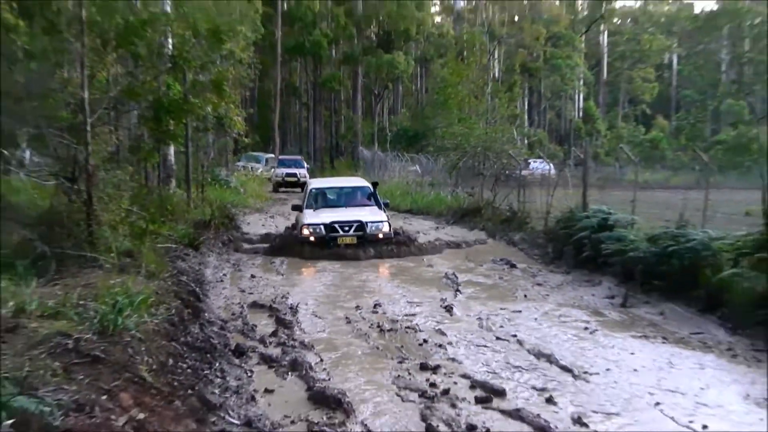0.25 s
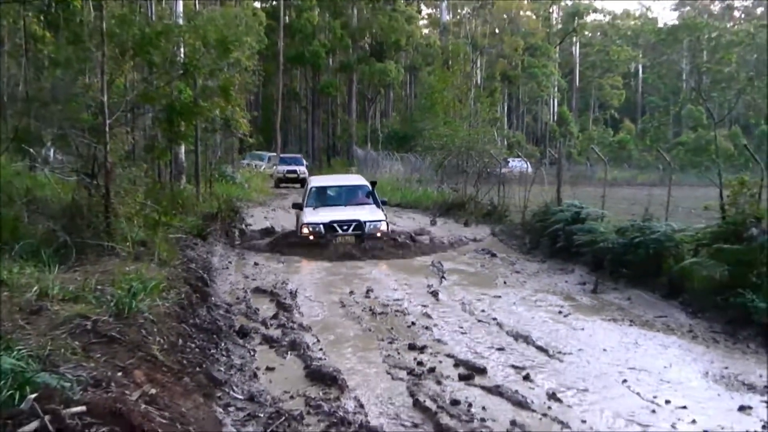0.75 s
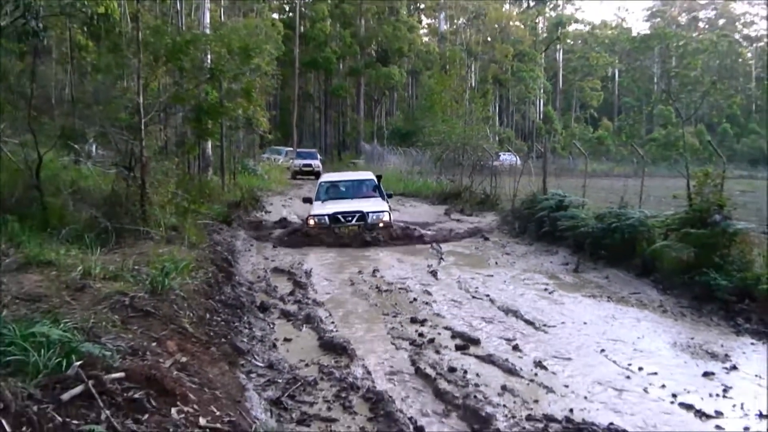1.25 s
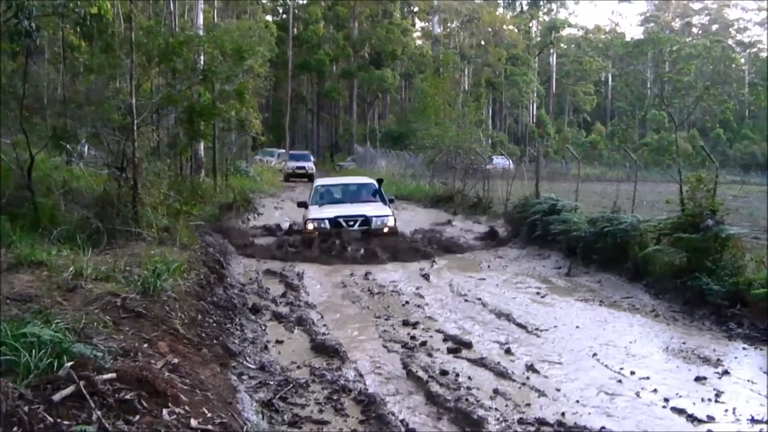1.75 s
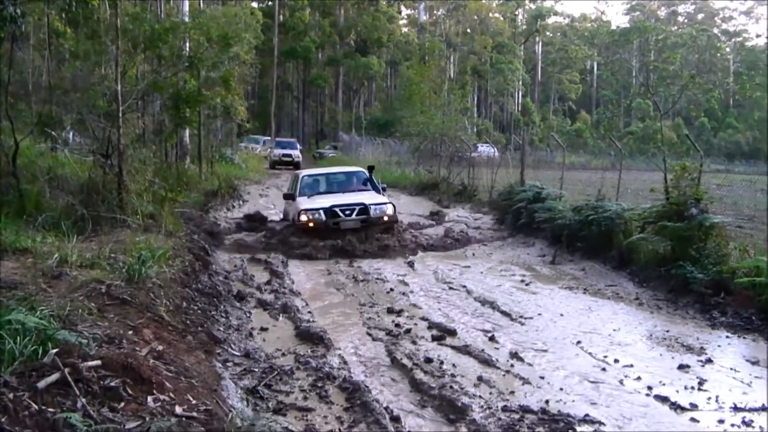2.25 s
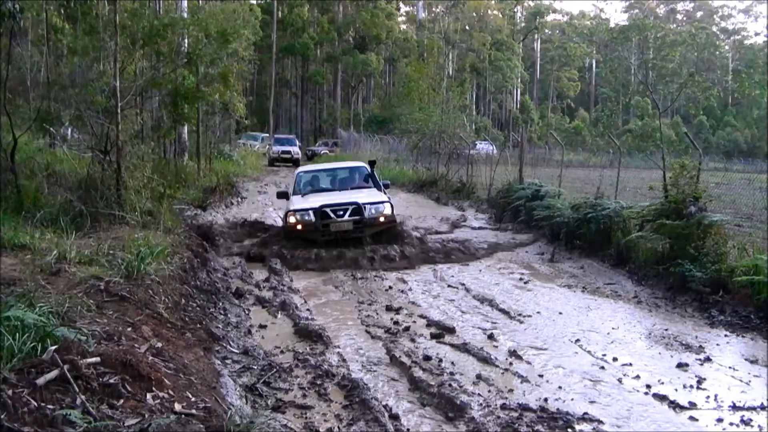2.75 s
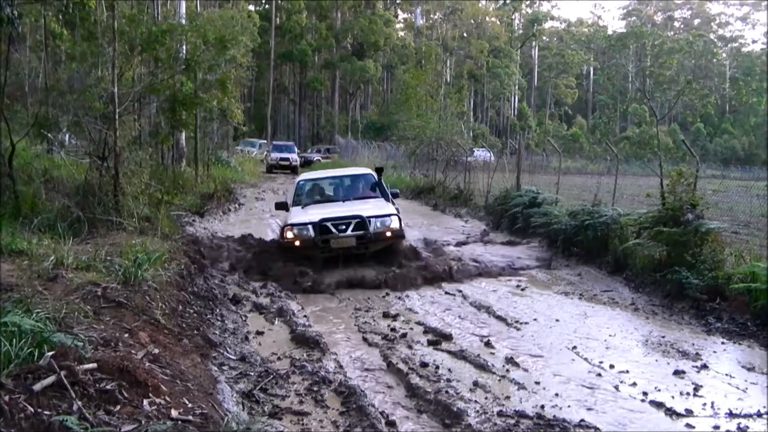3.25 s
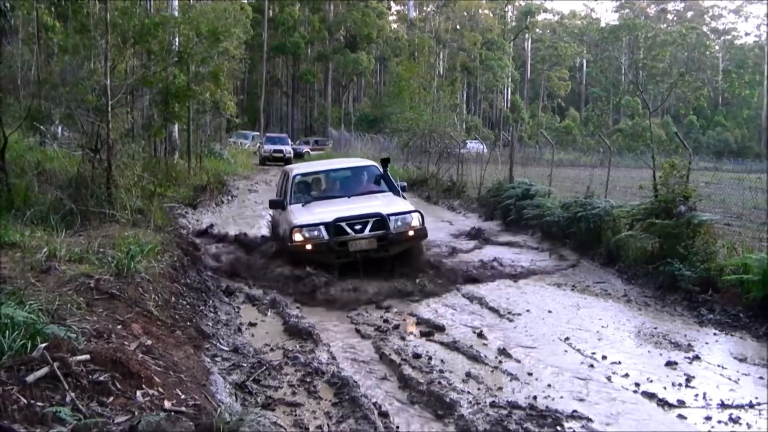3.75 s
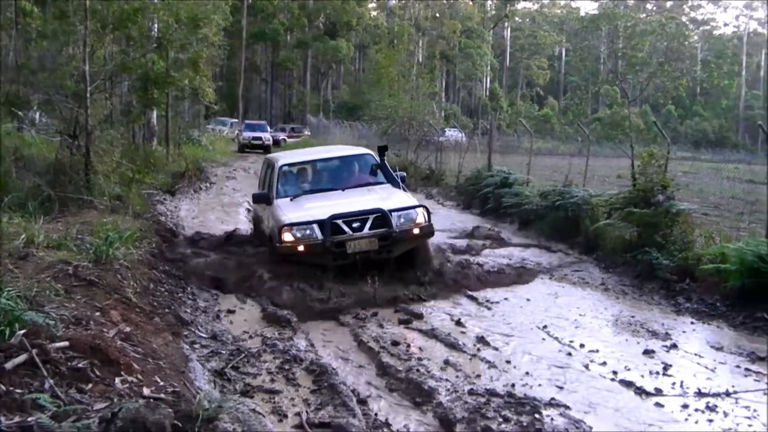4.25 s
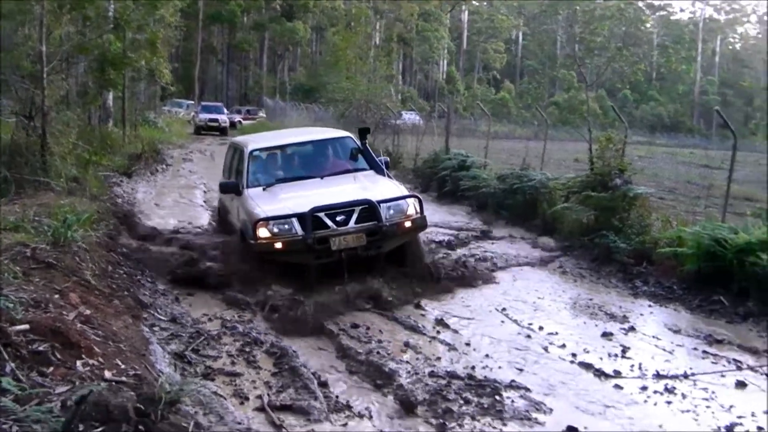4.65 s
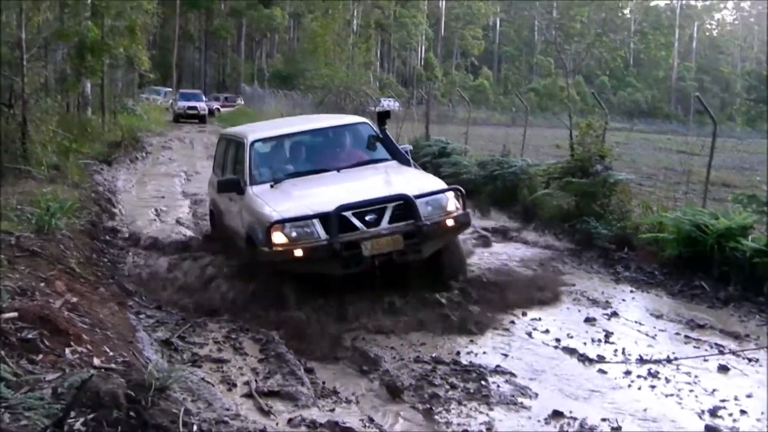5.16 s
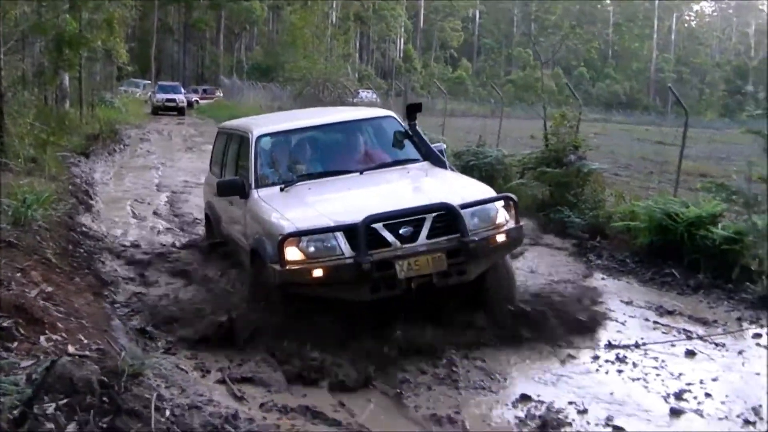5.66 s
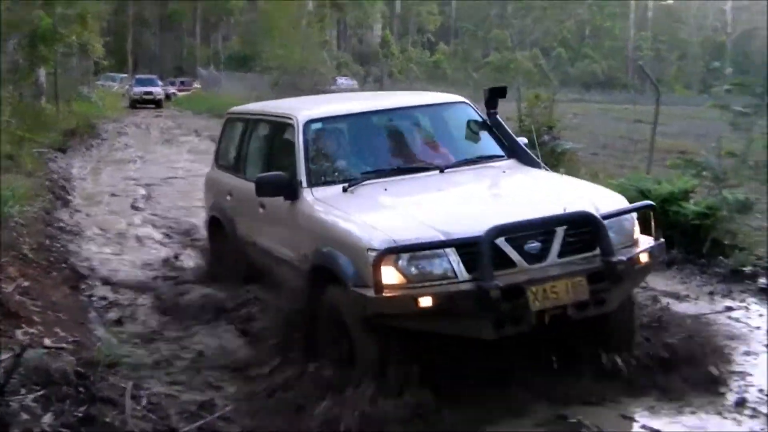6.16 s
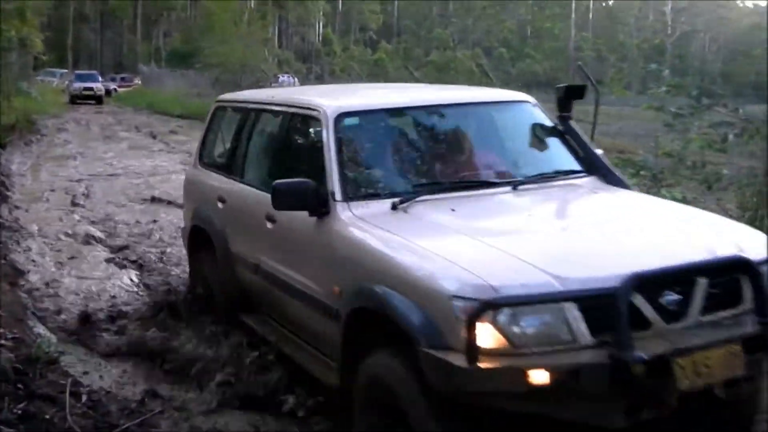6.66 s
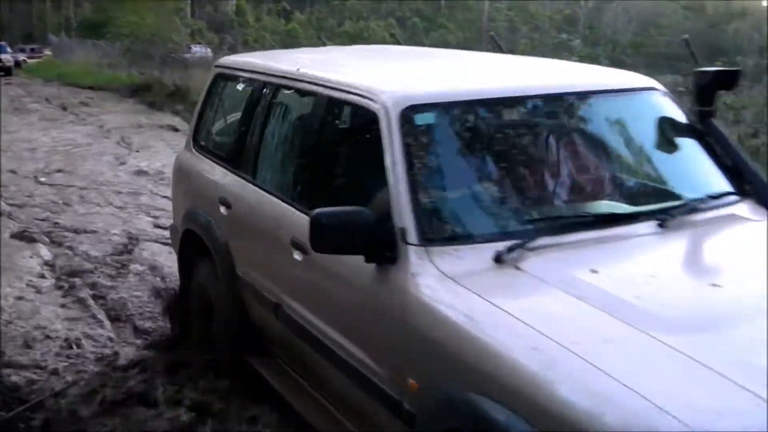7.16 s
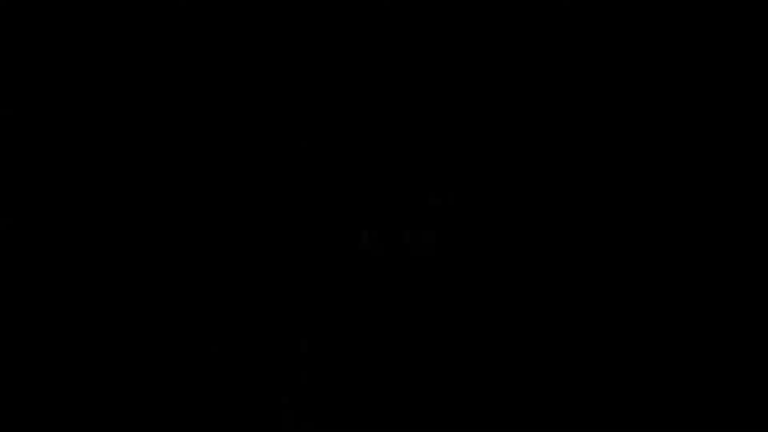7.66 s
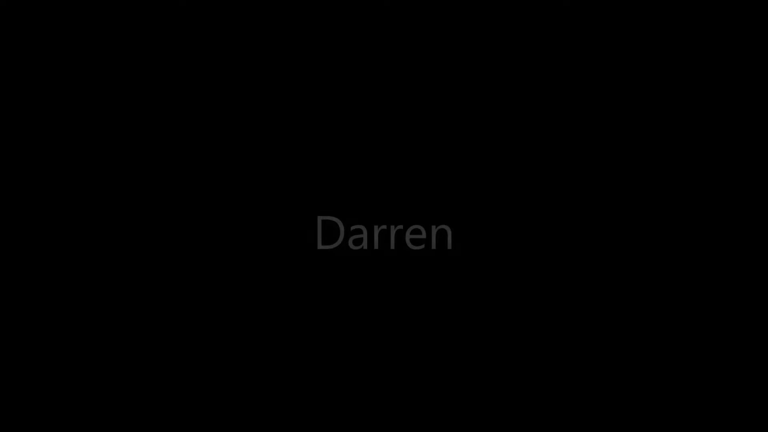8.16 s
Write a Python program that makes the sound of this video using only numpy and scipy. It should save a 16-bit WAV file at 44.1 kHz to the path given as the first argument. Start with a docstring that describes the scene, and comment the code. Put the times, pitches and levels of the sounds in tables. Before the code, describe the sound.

A four-wheel drive ploughs closer through deep mud, low engine roar under churning watery wash, other engines idling, until the sound stops dead.

```python
"""Four-wheel drive wading through mud

A four-wheel drive ploughs nearer through a deep mud hole on a forest track while two other engines idle on.
Filtered noise makes a low engine-and-fan roar and the wash of churned water; both arrive twice, direct and
off the wet ground. The wash brightens as the car nears. Wavering harmonics make the labouring engine and
the two idlers, which sink away. At the end the sound is cut to silence.
"""
import sys
import numpy as np
from scipy import signal
from scipy.fft import rfft, irfft, next_fast_len
from scipy.io import wavfile
from scipy.ndimage import uniform_filter1d, map_coordinates

SR = 44100
rng = np.random.default_rng(int(sys.argv[2]) if len(sys.argv) > 2 else 0)


def materialize(psi):
    """Save the field psi as 16-bit PCM at rate SR to the path in sys.argv[1].

    A 1-D psi becomes a single channel; in a 2-D psi each row is a channel.
    """
    bounded = np.clip(np.atleast_2d(psi).T, -1, 1)
    quanta = np.round(bounded * 32767).astype(np.int16)
    wavfile.write(sys.argv[1], SR, quanta)


def boost(x):
    """Linear amplitude factor 10**(x/20) for a level x in decibels (scalar or array-like)."""
    u = np.asarray(x, float) / 20
    return 10 ** u


N = 370440  # 8.4 s
T = np.arange(N) / SR


def columns(table):
    """Linear interpolation: each column of a timed curve, sample by sample."""
    s, *rest = np.transpose(table)
    return [np.interp(T, s, column) for column in rest]


def colour(x, table):
    """Zero-phase filtering: multiply the spectrum by a gain curve of (Hz, dB) points."""
    hz, db = np.transpose(table)
    size = next_fast_len(N)
    bins = np.arange(size // 2 + 1) * SR / size + 1
    gain = boost(np.interp(np.log(bins), np.log(hz), db))
    return irfft(rfft(x, size) * gain, size)[..., :N]


def unit(x, low_hz, high_hz):
    """Band-level normalisation: scale so that one band of the first row has rms 1."""
    bandpass = signal.butter(4, [low_hz, high_hz], "bandpass", fs=SR, output="sos")
    return x / signal.sosfilt(bandpass, x[0]).std()


def walk(rate):
    """Slow random modulation: levels held 1 / rate s and slewed twice; spread near 1."""
    k = int(SR / rate)
    held = np.repeat(rng.standard_normal(N // k + 1), k)
    return 1.05 * uniform_filter1d(uniform_filter1d(held, k), k)[:N]


def delayed(x, lag_ms):
    """Propagation delay: read each row at a fixed or moving, interpolated lag."""
    place = np.arange(N) - lag_ms * SR / 1000
    return np.array([map_coordinates(row, [place], order=3) for row in x])


# Side against mid level of two close microphone ports: hz [Hz], level_db [dB]
PORT_WIDTH = [(60, -31), (300, -34), (700, -27), (1300, -27), (2400, -17.5), (4400, -15), (6500, -7.5),
              (8500, -7), (10200, -2.5), (11600, -4), (13000, -.5), (15000, -5)]


def turbulence(patchy_db, rate, slaps_per_s, slap_db):
    """Turbulent flow noise: mid and side swell in patches and carry short slaps of uneven size."""
    chance = rng.random((int(slaps_per_s * N / SR), 2))
    slap_at = (chance[:, 0] * N).astype(int)
    hits = np.zeros(N)
    hits[slap_at] = boost(-slap_db * np.log(1 - chance[:, 1]))
    decay_s = 0.005
    burst = signal.lfilter([1], [1, -np.exp(-1 / (decay_s * SR))], hits)
    envelope = (1 + 0.14 * burst) * boost(patchy_db * walk(rate))
    mid, side = rng.standard_normal((2, N)) * envelope
    return np.array([mid, colour(side, PORT_WIDTH)])


# Spectrum of the direct engine-and-fan roar, relative: hz [Hz], level_db [dB per Hz]
ROAR_SPECTRUM = [(20, -21), (40, -20), (70, -11), (130, -7), (250, -0.5), (450, 1), (800, 0.5),
                 (1300, -10.5), (1700, -13.5), (2100, -20), (3500, -29.5), (8000, -33)]
ROAR_LAG_MS, ROAR_SHARE = 0.75, 0.87  # ground copy


def engine_and_fan_roar(ahead):
    """Comb filtering: broadband low roar plus its ground copy, which weakens with ahead."""
    direct = colour(turbulence(patchy_db=1.3, rate=16., slaps_per_s=150., slap_db=2.5), ROAR_SPECTRUM)
    copy = ROAR_SHARE * ahead * delayed(direct, ROAR_LAG_MS)
    return unit(direct + copy, 180, 550)


BOUNCE_SPLIT_HZ, TOP_SPLIT_HZ = 5400, 9400
LOW_SHARE, MUD_LEAD_RAD = 0.59, 0.56
LOW_LAG_MS, LOW_LAG_NEAR_MS = 0.894, 0.766  # far, near
# treble glancing off the water: lag at the start, shrinking steadily
GLANCE_MS, GLANCE_MS_PER_S = .868, -.0155
GLANCE_SHARE, TOP_SHARE, TOP_GONE_S = .26, .46, 6.3


def bounced(x, low_ms, ahead):
    """Ground-reflection interference: a delayed copy makes a comb; soft mud turns its lower part's phase."""
    low, under_top = (signal.sosfiltfilt(signal.butter(3, hz, fs=SR, output="sos"), x)
                      for hz in (BOUNCE_SPLIT_HZ, TOP_SPLIT_HZ))
    analytic = signal.hilbert(low, next_fast_len(N))[:, :N]
    turned = (analytic * np.exp(1j * MUD_LEAD_RAD)).real
    # the copy's top starts stronger than its middle treble and fades early
    glance = GLANCE_SHARE * ahead * (under_top - low)
    top = TOP_SHARE * np.clip(1 - T / TOP_GONE_S, 0, 1) * (x - under_top)
    low_copy = LOW_SHARE * ahead * delayed(turned, low_ms)
    return x + low_copy + delayed(glance + top, GLANCE_MS + GLANCE_MS_PER_S * T)


# Direct wash heard from afar, relative spectrum: hz [Hz], level_db [dB per Hz]
WASH_FAR_SPECTRUM = [(80, -40), (200, -6), (350, -3), (650, -4.5), (1000, 0.5), (1600, -1), (2000, -9),
                     (2600, -5.5), (3500, -9), (4700, -6), (5700, -14), (8000, -14), (11500, -18),
                     (15200, -28)]
# Direct wash heard close by, relative spectrum: hz [Hz], level_db [dB per Hz]
WASH_NEAR_SPECTRUM = [(80, -27.5), (200, -11), (350, -2), (650, -13.5), (1000, -6), (1600, 1), (1900, 1.5),
                      (2150, -8), (3200, -7), (4500, -7), (5800, -7), (7000, -10.5), (10500, -9),
                      (15200, -14)]


def churned_water(near, ahead):
    """Distance absorption: air and undergrowth take less treble from a nearer splash."""
    water = turbulence(patchy_db=0.88, rate=9., slaps_per_s=130., slap_db=2.)
    far = unit(colour(water, WASH_FAR_SPECTRUM), 2200, 6000)
    close = unit(colour(water, WASH_NEAR_SPECTRUM), 2200, 6000)
    direct = (1 - near) * far + near * close
    low_ms = LOW_LAG_MS + (LOW_LAG_NEAR_MS - LOW_LAG_MS) * near
    return bounced(direct, low_ms, ahead)


def harmonics(hz, orders, waver_db, jitter):
    """Additive synthesis: tones on multiples of a slightly unsteady pitch; each wavers on its own."""
    phase = 2 * np.pi * np.cumsum(hz * (1 + jitter * walk(14.))) / SR
    total = 0
    for multiple, db in orders:
        level = np.sqrt(2) * boost(db + waver_db * walk(9.))
        total = total + level * np.sin(multiple * phase + 2 * np.pi * rng.random())
    return total


# The wading engine: start_s [s], pitch_hz (firing rate) [Hz], level_db [dB]
WADING_ENGINE = [(1.7, 41, -34), (2.2, 42, -29), (2.5, 42.6, -31), (3.05, 44.7, -23), (3.4, 42.5, -29),
                 (3.65, 37, -37), (3.95, 34, -30), (4.35, 34.6, -32), (4.7, 41.5, -37), (5.05, 44.3, -28),
                 (5.35, 42, -34), (5.7, 44, -44), (6.2, 50, -37), (6.8, 53.3, -31), (6.95, 50, -39),
                 (7.15, 49.7, -34), (7.63, 46, -46)]
# Its harmonics, relative to that level: multiple [of the firing rate], deep_db (in deep water) [dB],
# out_db (climbing out) [dB]
WADING_ORDERS = [(1, -21, -10.5), (2, -10.5, -0.5), (3, 0, -14.5), (4, -5.5, -5.5)]
CLIMBS_OUT_S, CLIMB_S = 4.5, .3  # middle and length of the change


def wading_engine():
    """Harmonic source: a labouring engine whose order balance shifts as it climbs out of deep water."""
    hz, db = columns(WADING_ENGINE)
    out_of_water = np.clip((T - CLIMBS_OUT_S) / CLIMB_S + .5, 0, 1)
    orders = [(multiple, deep_db + (out_db - deep_db) * out_of_water)
              for multiple, deep_db, out_db in WADING_ORDERS]
    rise = np.clip((T - WADING_ENGINE[0][0]) / .3, 0, 1)
    return rise * boost(db) * harmonics(hz, orders, waver_db=2.2, jitter=.008)


# Idler tones, relative to the strongest: multiple [of its pitch], level_db [dB]
FOUR_IDLE_ORDERS = [(1 / 2, -20.5), (3 / 4, -15), (1, 0), (5 / 4, -26.5)]
SIX_IDLE_ORDERS = [(1 / 3, -14), (2 / 3, -10), (1, 0), (4 / 3, -5.5), (5 / 3, -8)]
# Each idler: pitch_hz (strongest harmonic) [Hz], level_db (of that harmonic, before it sinks) [dB],
# lost_db (change at full nearness) [dB], waver_db (spread) [dB]
FOUR_IDLE = (116, -22.5, -18, 2.5)
SIX_IDLE = (107.5, -30, -6.5, 4)
SHADOW_DB = -5  # the car hides the idlers as it draws alongside


def idling_engines(near, ahead):
    """Harmonic sources: two near-steady idlers sink steadily away, and the car hides them further as it draws
    alongside."""
    total = 0
    for (hz, db, lost_db, waver_db), orders in ((FOUR_IDLE, FOUR_IDLE_ORDERS), (SIX_IDLE, SIX_IDLE_ORDERS)):
        level = boost(db + lost_db * near + SHADOW_DB * (1 - ahead))
        drifting_hz = hz * (1 + .005 * walk(1.5))
        total = total + level * harmonics(drifting_hz, orders, waver_db, jitter=.004)
    return total


TREBLE_LEAN, TREBLE_LEAN_HZ = .1, 10000  # the left port hears a little more treble
PASSING_LEAN = .03  # the image moves right as the car draws alongside


def stereo_ports(mid, side, ahead):
    """Level-difference stereo: unequal port levels lean the treble left and the passing sound right."""
    highpass = signal.butter(2, TREBLE_LEAN_HZ, "highpass", fs=SR, output="sos")
    side = side + TREBLE_LEAN * signal.sosfiltfilt(highpass, mid)
    side = side - PASSING_LEAN * (1 - ahead) * mid
    return np.array([mid + side, mid - side])


# Gains on the band-normalised sources: start_s [s], roar_db [dB], wash_db (before its ground copy) [dB]
DRIVE_LEVELS = [(0, -19, -25.5), (.4, -19, -23.5), (.8, -19.5, -26.5), (1.45, -18.5, -23.5),
                (2.2, -18, -24.5), (3, -19, -24.5), (3.6, -19, -23.5), (4.2, -19, -24), (4.65, -20, -22.5),
                (5.1, -20, -22.5), (5.9, -22.5, -22.5), (6.35, -22, -21), (6.8, -23, -21.5),
                (7.1, -24.5, -21.5), (7.63, -30.5, -21.5)]
# The approach: start_s [s], nearness [0-1]
NEARNESS = [(0, 0.03), (2.4, 0.19), (4, 0.38), (5.4, 0.6), (6.5, 0.66), (7, 1), (7.63, 0.96)]
ALONGSIDE_S, DRAWS_UP_S = 7.83, 2.3  # ahead falls from 1 to 0 over DRAWS_UP_S, ending at ALONGSIDE_S


def scene():
    """Superposition: roar and wash with their ground bounce, engine tones in the middle."""
    roar_db, wash_db = columns(DRIVE_LEVELS)
    near = np.clip(columns(NEARNESS)[0], 0, 1)
    ahead = np.clip((ALONGSIDE_S - T) / DRAWS_UP_S, 0, 1)
    roar = boost(roar_db) * engine_and_fan_roar(ahead)
    wash = boost(wash_db) * churned_water(near, ahead)
    mid, side = roar + wash
    mid = mid + wading_engine() + idling_engines(near, ahead)
    return stereo_ports(mid, side, ahead)


def top_cut(x):
    """Nothing passes above the cut-off."""
    return signal.sosfilt(signal.butter(12, 15710, fs=SR, output="sos"), x)


BODY_MS, BODY_SHARE = 0.22, 0.1
TOP_HZ, CUT_S = 15280, 7.6275


def record(dry):
    """Reflection, saturation and band-limiting: camera-body echo, rounded peaks, cut top, a dead stop."""
    heard = dry + BODY_SHARE * delayed(dry, BODY_MS)
    heard = np.tanh(.75 * heard) / .75
    lowpass = signal.ellip(8, .2, 60, TOP_HZ, fs=SR, output="sos")
    heard = signal.sosfilt(lowpass, heard)
    finished = heard * (T < CUT_S)
    return top_cut(finished)


dry = scene()
out = record(dry)
materialize(out)
```